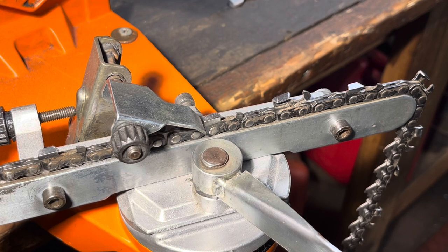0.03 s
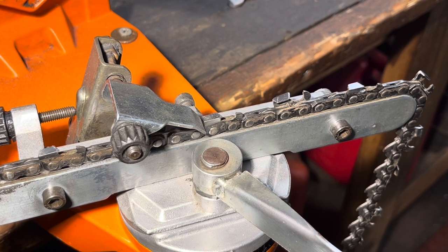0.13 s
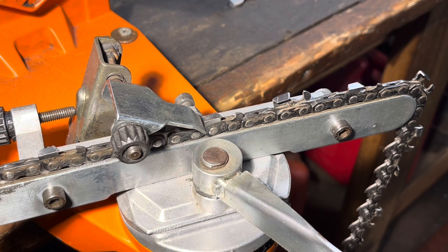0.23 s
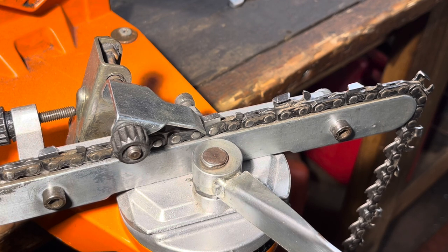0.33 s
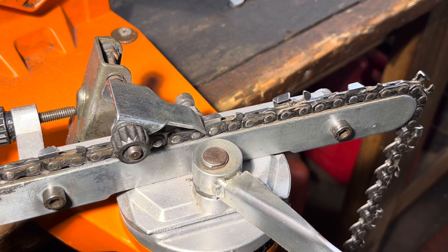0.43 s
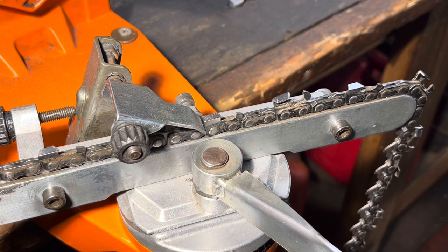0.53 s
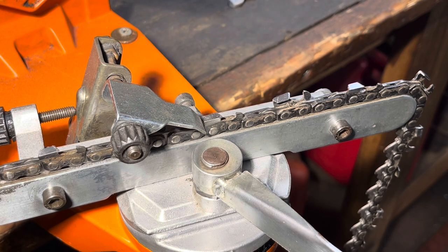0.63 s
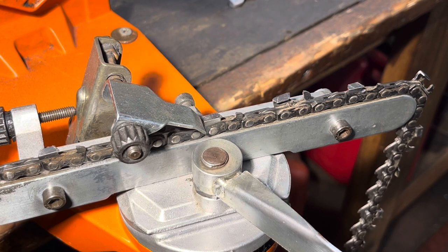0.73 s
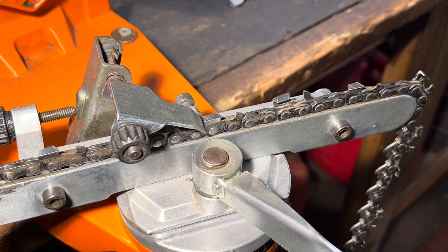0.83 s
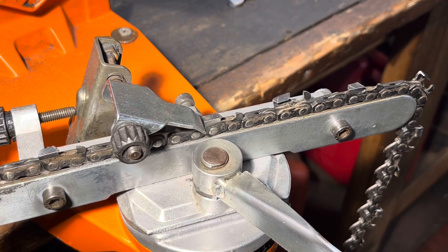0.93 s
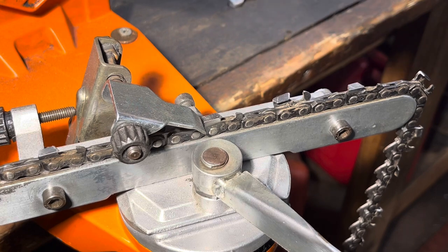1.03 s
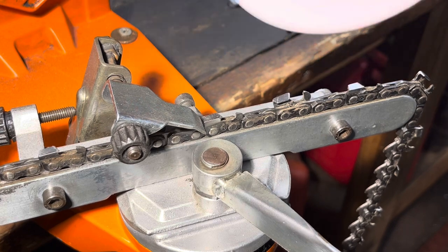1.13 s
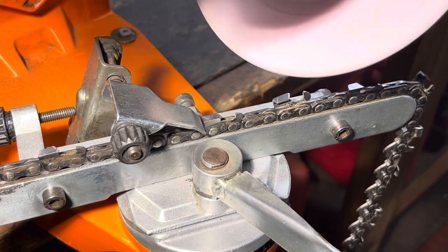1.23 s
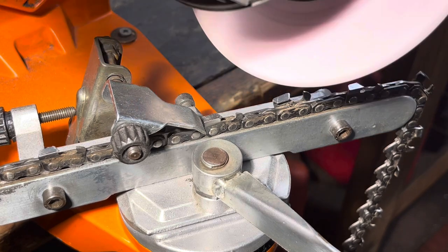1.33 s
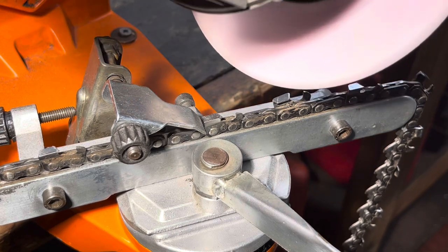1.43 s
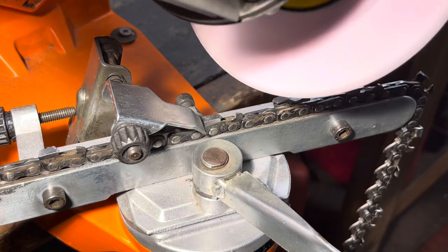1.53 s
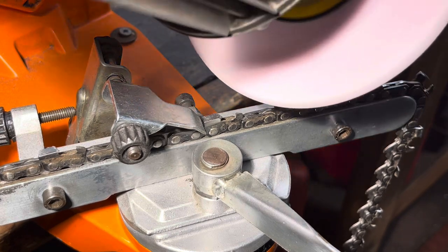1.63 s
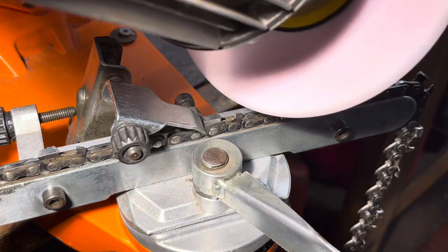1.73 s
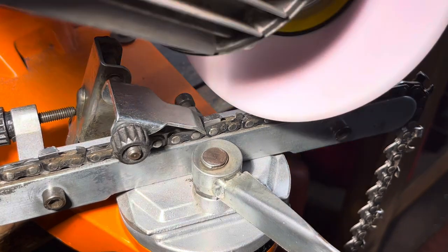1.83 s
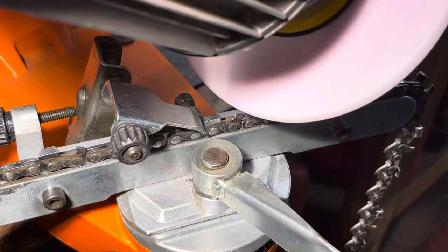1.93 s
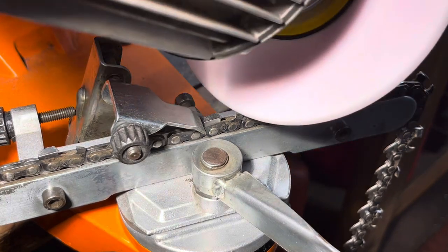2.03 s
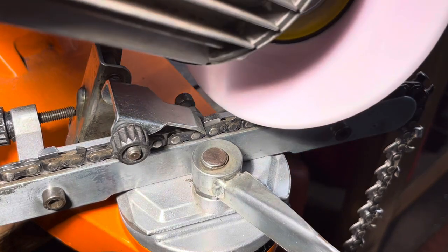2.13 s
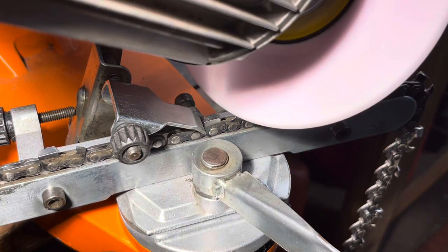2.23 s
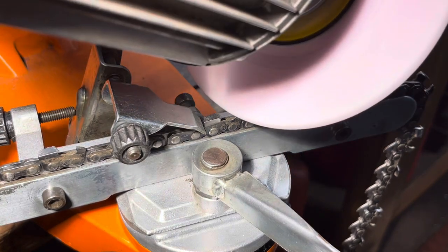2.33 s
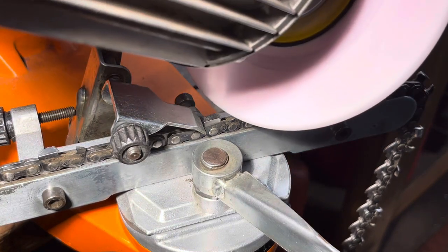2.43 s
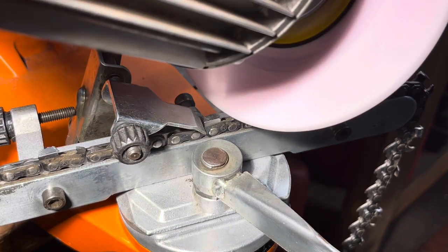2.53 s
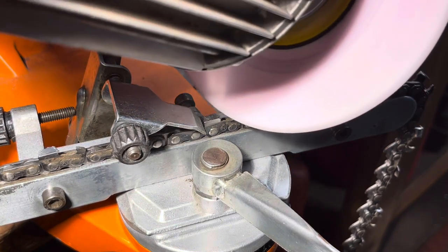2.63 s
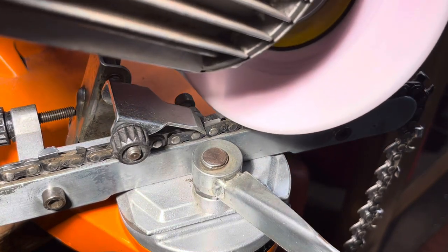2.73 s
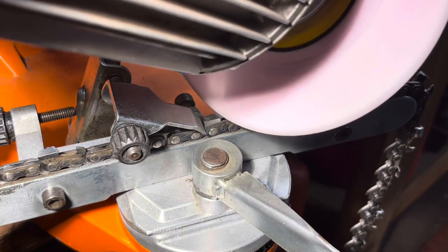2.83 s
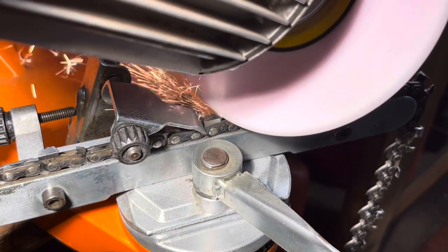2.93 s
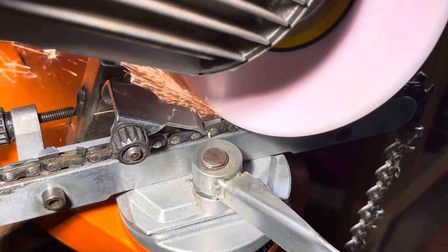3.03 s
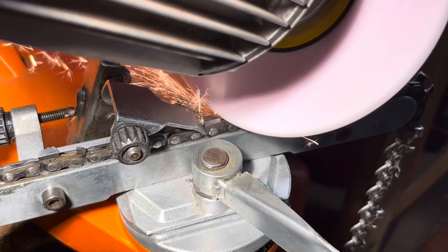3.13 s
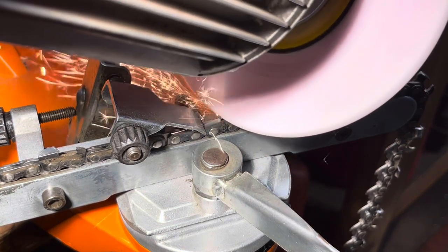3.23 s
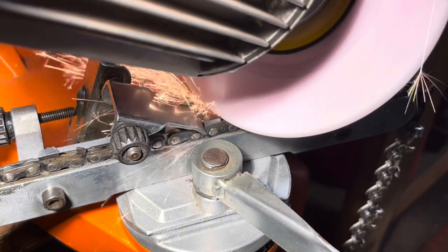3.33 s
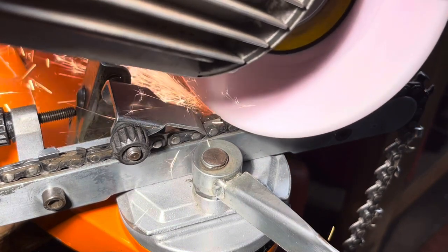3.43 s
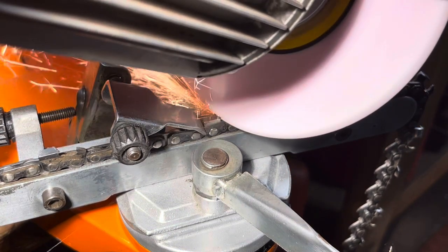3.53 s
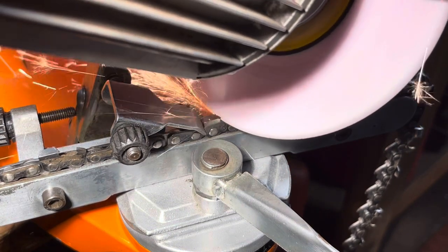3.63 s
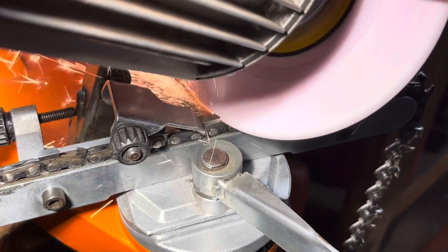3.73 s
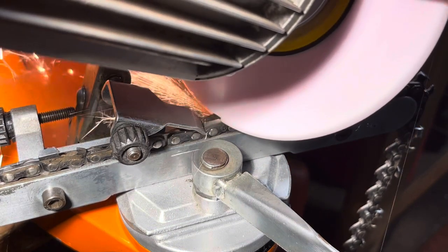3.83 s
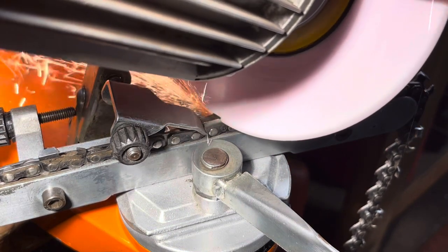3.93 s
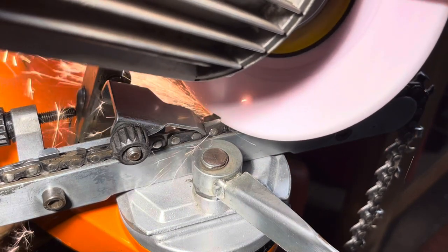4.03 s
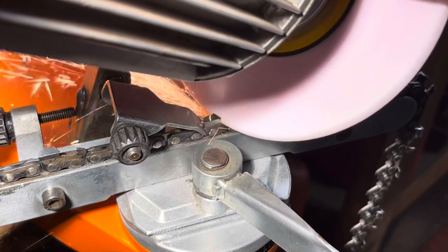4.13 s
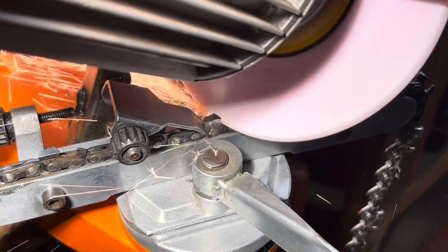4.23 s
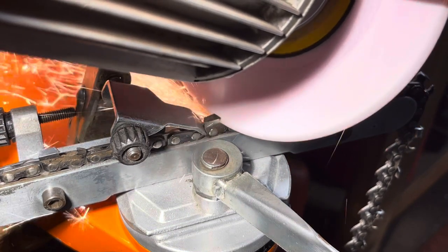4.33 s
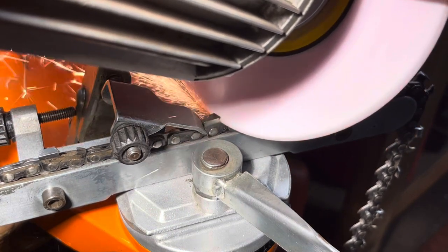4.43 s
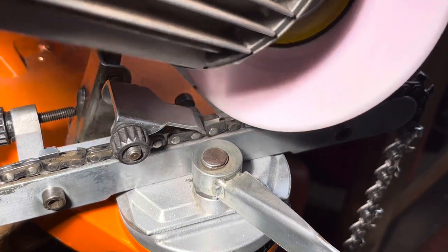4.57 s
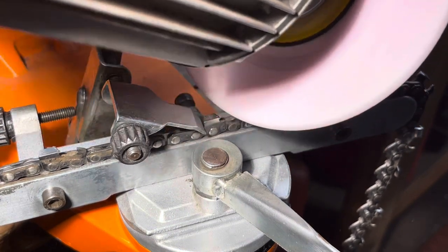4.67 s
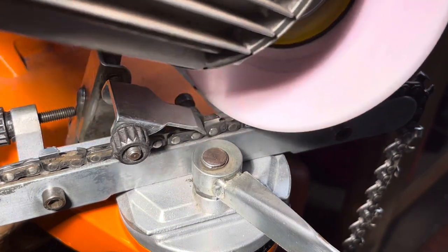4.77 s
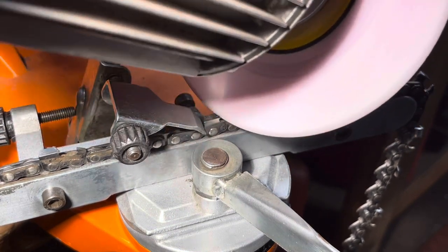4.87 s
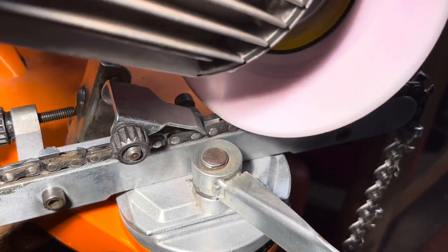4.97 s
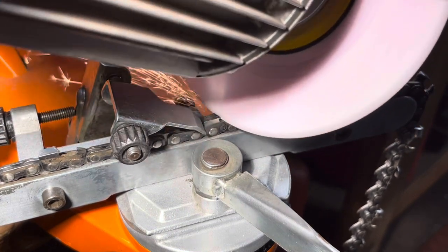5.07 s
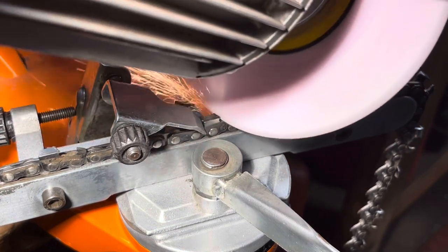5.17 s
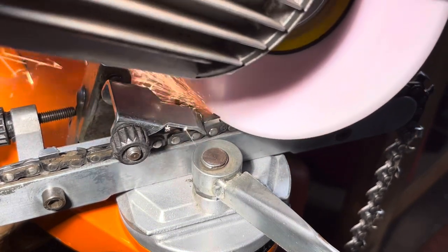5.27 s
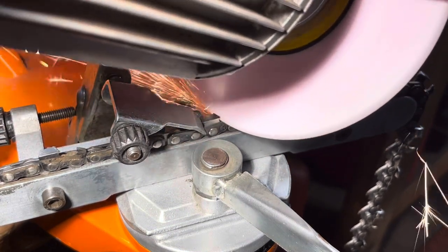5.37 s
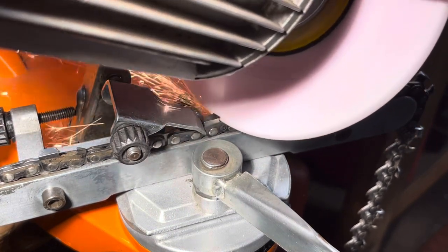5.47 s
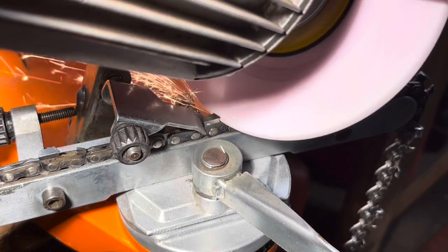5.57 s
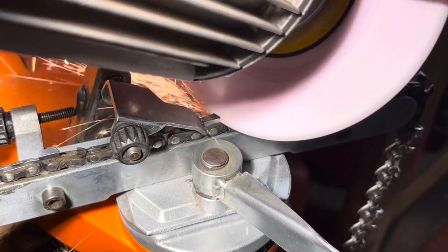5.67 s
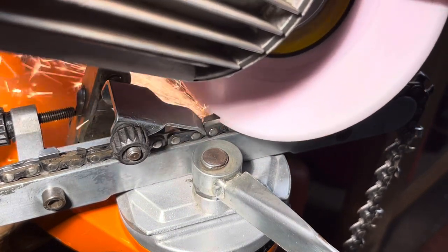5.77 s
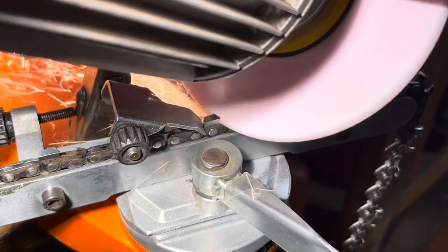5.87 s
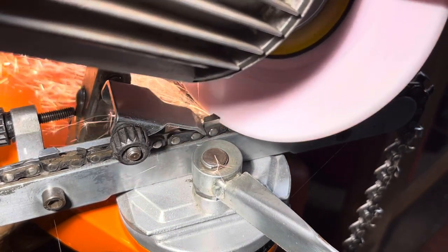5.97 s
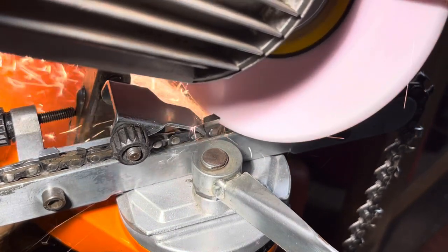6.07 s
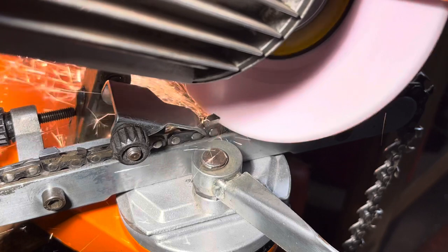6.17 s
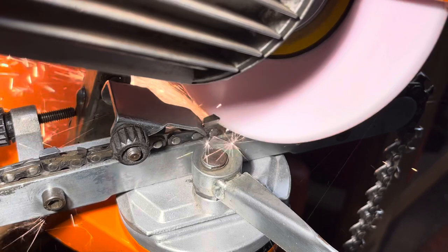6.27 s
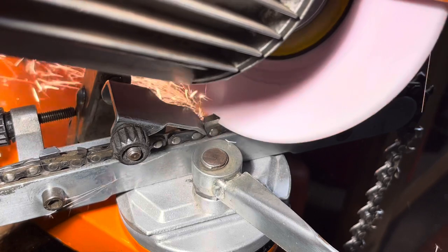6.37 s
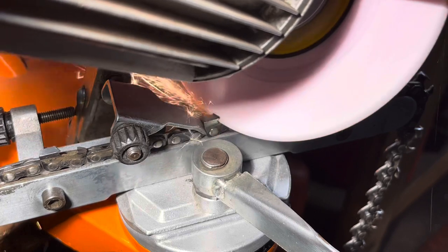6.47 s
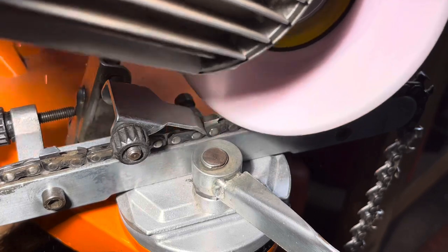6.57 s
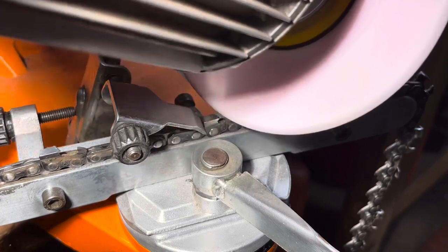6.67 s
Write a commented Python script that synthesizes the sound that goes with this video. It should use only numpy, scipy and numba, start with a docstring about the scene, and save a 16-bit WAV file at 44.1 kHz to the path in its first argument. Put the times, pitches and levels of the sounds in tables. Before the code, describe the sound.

Close up in a small workshop, a bench chain grinder switches on with a short electrical buzz and rising whine, then settles into airy whirring that grows as the head lowers. The wheel knocks a saw tooth and grinds loudly, first in fast fluttering bites, then a dense, squealing rasp. It lifts briefly, leaving faint motor noise and a clear ring, then a second pass begins lightly and swells, ending as the wheel lifts.

```python
"""Chain grinder on a saw tooth

A bench chain grinder runs up in a small workshop: windings buzz, rotor slots whine, fan noise and tones rise.
The wheel is pressed twice on a tooth: first only its high side bites, once a turn, then the whole rim rasps.
Noise laid round the rim, mostly repeating each turn, drives the rasp and the resonances of tooth and machine.
The motor slows under load; tooth and cutting edge ring and squeal as modes of variable pitch and damping."""
import sys
import numpy as np
from scipy import signal
from scipy.fft import rfft, irfft, next_fast_len
from scipy.io import wavfile
from scipy.ndimage import uniform_filter1d, map_coordinates
from numba import njit

SR = 44100
rng = np.random.default_rng(int(sys.argv[2]) if len(sys.argv) > 2 else 0)


def pcm_store(signal):
    """Save signal as 16-bit PCM."""
    levels = np.round(np.clip(np.atleast_2d(signal), -1, 1) * 32767)
    wavfile.write(sys.argv[1], SR, levels.astype(np.int16).T)


N = 295514
T = np.arange(N) / SR

# run-up: t/s, share of full speed
RUN_UP = [(.05, 0), (.245, .93), (.31, 1)]
# shaft dragged down, per pass: t/s, speed/(turns/s)
SAG = [
    [(2.86, 59.2), (3.0, 58.95), (3.17, 58.2), (3.3, 58.1), (3.47, 57.4), (3.62, 57.15), (3.72, 56.5),
     (3.95, 57), (4.18, 56.6), (4.33, 55.8), (4.48, 57.5), (4.62, 59.2)],
    [(5.05, 59.2), (5.28, 58.6), (5.62, 58.4), (5.78, 57.8), (5.92, 55.9), (6.05, 55.1), (6.27, 55.1),
     (6.45, 57.9), (6.55, 58.2), (6.62, 59.2)],
]
# winding buzz before its envelope: f/Hz, level/dB
START_BUZZ = [(463, -57.5), (657, -66), (802, -70), (1421, -70), (2400, -75)]
FULL_SPEED_TURNS_PER_S = 59.2
BUZZ_FLUTTER_DB = 3.5
SLOTS_PER_TURN, WHINE_DB, WHINE_FRAY_RAD = 30, -44.8, 1.2
WHINE_SWELL_S = (0.118, 0.14, 0.05)  # start, hold, release
HOUSING_DB, HOUSING_SWELL_S = -50, (0.13, 0.07, 0.11)
ATTACK_S = 0.0072  # default swell

# head position: t/s, 0 up - 1 down
HEAD_DOWN = [(.35, 0), (.98, 0.13), (1.15, 0.37), (1.6, 0.41)]
# motor and bearing tones at full speed: f/Hz, level head up/dB, level head down/dB
TONES = [(591, -52.5, -41.5), (1180, -54.5, -50), (1783, -57, -37), (2223, -54, -32), (2503, -49.5, -39),
         (2552, -59, -43), (2783, -66.5, -33), (3065, -67, -36), (3343, -57, -61), (3625, -59.5, -62),
         (3905, -63, -57), (4188, -55, -45), (4237, -53, -53), (4275, -59, -62), (4517, -55.5, -68),
         (4797, -62, -55), (5076, -58, -76), (5308, -70, -49), (5355, -66, -66), (5642, -67, -70),
         (5922, -71, -31), (6202, -74, -45)]
# fan draught spectrum: f/Hz, level/dB per Hz
DRAUGHT = [(20, -44), (35, -34), (55, -5), (90, -1.5), (140, -2), (220, -3.5), (400, -9), (550, -8.5),
           (900, -40), (2000, -84.5)]
# fan whir spectrum: f/Hz, level/dB per Hz
WHIR = [(250, -33), (650, -7.5), (900, -13), (1250, -8), (1480, -2.5), (2000, -9), (2400, -3.5),
        (2800, -13.5), (3700, -15.5), (5200, -23.5), (7000, -22.5), (8700, -18), (9300, -24), (15500, -32)]
# bearing roughness spectrum: f/Hz, level/dB per Hz
BEARING = [(300, -26), (1200, -2.5), (2500, -31), (3500, -5.5), (4600, 5.5), (6200, 1), (8000, -33)]
# diffuse part of the motor noise: f/Hz, level/dB per Hz
DIFFUSE_MOTOR = [(40, -30), (120, -0.5), (500, -6), (1200, -3.5), (2500, -28), (5000, -17), (8000, -26),
                 (14000, -40.5)]
# base levels at full speed, before trim and gain drop: (head up, head down)
DRAUGHT_DB, WHIR_DB, HUM_DB = (-42, -29), (-39.5, -31.5), (-47, -34)
DRAUGHT_TRIM_DB, WHIR_TRIM_DB = 0.5, 0.4
DRAUGHT_POWER, WHIR_POWER, HUM_POWER, TONE_POWER = 4, 1.8, 0.86, 28  # exponents of speed
BEARING_DB, DIFFUSE_MOTOR_DB = -15.0, -11  # re whir before trim
TONE_FLUTTER_DB = 2.7
GAIN_DROP_DB, GAIN_DROP_S = 14.5, 0.4  # motor heard fainter from first touch: depth, time constant

# passes: touch t/s, lift t/s, lag of the high side/turns, once-a-turn swing at light touch/dB
CONTACT = [(2.861, 4.515, 0.049, 6), (5.03, 6.557, -0.18, 5.5)]
# hand pressure per pass: t/s, level/dB
PRESSURE = [
    [(2.87, -21), (3.0, -21.5), (3.05, -23), (3.3, -23), (3.5, -19.5), (3.59, -24), (3.8, -21), (4.1, -23),
     (4.41, -23), (4.46, -28)],
    [(5.03, -37.5), (5.06, -31.5), (5.14, -35), (5.21, -27), (5.8, -25.5), (5.94, -22.5), (6.3, -21.5),
     (6.45, -28), (6.53, -32), (6.555, -32.5)],
]
LIGHT_CUT_TURNS_PER_S, FULL_LOAD_SAG_TURNS_PER_S = 58.7, 2.2  # load starts below; further sag at full load
LOADED_SWING_DB, BED_IN_POWER = .5, .32  # swing at full load; exponent of load
BITE_SKEW_RAD, BITE_SCATTER_DB = 0.39, 1.1  # skew: quick bite, slow release; scatter at zero load
LIFT_S = .024
# pairs: (light touch, full load)
REPEAT = (0.934, 0.875)  # share of the grit pattern kept each turn
PATCH_DB = (1.7, .8)  # depth of coarse rim patches
JUDDER_DB = (1.05, 3.1)  # depth at the cutting edge
GRIT_JUDDER_SHARE = 0.14
BOUNCE_SWELL_S, BOUNCE_REPEAT = (6.13, 0.22, 0.17), 0.2  # wheel skips: the pattern repeats less

# rasp spectrum: f/Hz, level/dB per Hz
RASP = [(1200, -26), (2050, -14.5), (2600, -5), (3600, -10), (4100, -4.5), (4330, -14.5), (4650, -5),
        (5250, -5.5), (5750, -28), (6200, -11), (6500, -10), (7250, -21.5), (7600, -3), (8600, -34),
        (9100, -4), (9700, -10), (10800, -17.5), (11400, -5), (11900, -21), (12600, -3.5), (13050, -18),
        (13450, -7), (13900, -9), (14400, -20), (14900, -11.5), (15300, -29), (15700, -47)]
# loose chain links: f/Hz, width/Hz, level/dB
LOOSE_LINKS = [(2607, 93, -1), (3110, 71, 6), (3460, 113, 1.5), (3830, 110, -6), (4468, 75, 6),
               (4640, 100, -6), (4952, 53.5, 2.5), (5340, 110, -4)]
# links pressed tight, per pass: f/Hz, width/Hz, level/dB
TIGHT_LINKS = [
    [(2787, 86, -9), (3150, 150, 1), (3450, 70, 1), (3770, 67, 0.5), (3860, 200, -2), (4320, 90, -4.5),
     (4680, 170, 7.5), (5040, 86, -7), (5270, 78, 2)],
    [(2300, 59, -1.5), (2690, 44, -1.5), (3120, 49, -4.5), (3495, 90, -6.5), (4210, 110, -5),
     (4530, 130, 3.5), (4920, 100, 3), (5340, 110, 1.5), (5920, 86, -5.5)],
]
# swing arm: f/Hz, width/Hz, level/dB
ARM = [(692, 13.5, 0)]
# bench, per pass: f/Hz, width/Hz, level/dB
BENCH = [
    [(224, 46, -13), (492.3, 12, 11.5), (530.5, 10, -4)],
    [(50.08, 37, -18), (126, 60, -6.5), (210, 39, -8.5), (343, 21, -3.5), (505, 52, 5)],
]
# vice, per pass: f/Hz, width/Hz, level/dB
VICE = [
    [(1028, 19, -10.5), (1225, 34.6, 3.5), (1368, 8.6, 6), (1464, 38, -2.5)],
    [(1002, 70, -6.5), (1206, 94, 2.5), (1480, 76, -6)],
]
# clamp, per pass: f/Hz, width/Hz, level/dB
CLAMP = [
    [(1693, 14, -1), (1732, 30, 5.5), (1877, 18, 3)],
    [(1676, 35, -16), (1745, 22, -7)],
]
# singing tooth: f/Hz, rise at full load/Hz, level/dB
TOOTH = [(2992, 30, -3)]
# squealing cutting edge: f/Hz, rise at full load/Hz, level/dB
SQUEAL = [(6798, 60, 0), (7385, 10, -17), (9505, 15, -9), (10190, 10, -18), (12600, 10, -2),
          (13420, 10, -9)]
# answer of each part to the press, per pass: level light touch/dB, level full load/dB
ANSWER = {"bench": [(-18, -33.5), (-57, -17)], "arm": [(-24.5, -25.5), (-22, -21)], "vice": [(-2, -5.5),
          (-7, -5)], "clamp": [(-12, -11), (-11.5, -13.5)], "tooth": [(-0.5, -15), (-2.5, -12)],
          "edge": [(-2, -2.5), (-1.5, 1)]}
# part catches or is stifled: t/s, attack/s, hold/s, release/s, gain/dB, part
CATCHES = [(2.877, .008, 0.12, 0.059, 10.5, "bench"), (2.991, .01, 0.24, 0.45, 2, "vice"),
           (2.991, 0.017, 0.051, 0.057, 1, "tooth"), (2.989, 0.024, 0.34, 0.44, 9, "tooth"),
           (3.04, 0.018, 0.044, 0.074, 5.5, "edge"), (3.064, 0.025, 0.65, 0.13, 8, "arm"),
           (3.17, 0.083, 0.18, 0.25, 2, "clamp"), (3.406, 0.062, 0.096, 0.035, -0.5, "edge"),
           (4.125, 0.045, 0.29, 0.077, 12, "bench"), (4.364, .03, 0.053, .02, 4, "edge"),
           (4.417, .02, .12, 0.033, -2, "edge"), (5.02, .008, 0.055, 0.04, 5.5, "edge"),
           (5.57, 0.079, 0.14, 0.1, 5, "tooth"), (5.68, .05, 0.16, 0.12, 2.5, "vice"),
           (5.867, .04, 0.057, 0.093, 8, "tooth"), (6.162, .008, 0.032, 0.25, 9, "bench"),
           (6.4, .07, 0.16, .03, -3, "edge"), (6.454, .02, 0.1, 0.045, 7.5, "vice")]
# clamp or link locks into one note: t/s, attack/s, hold/s, release/s, f/Hz, level/dB
NOTES = [(2.857, .005, 0.17, 0.072, 1655, -26), (2.875, .02, 0.1, .06, 4952, -30.5),
         (3.17, 0.093, 0.21, 0.25, 1645, -26.5), (4.993, 0.011, 0.08, .12, 1655, -48),
         (5.17, .035, 0.49, 0.16, 1756, -34), (4.47, .03, .02, .04, 4952, -42),
         (6.5, .03, .03, .04, 4560, -44)]
# diffuse part of the grinding noise: f/Hz, level/dB per Hz
DIFFUSE_GRIND = [(150, -11.5), (500, -9), (1200, 12), (2200, 0.5), (4500, -39), (7000, 6), (8300, -41),
                 (10000, 0), (13000, -2), (15000, -30)]
RASP_DB, LINK_DB = (-0.5, 0.5), (-4.5, -4)  # re press: (light touch, full load)
DIFFUSE_GRIND_DB = -18  # re press
NOTE_WIDTH_HZ, NOTE_PULSE_DB = 20, 6.5
TOOTH_WIDTH_HZ, EDGE_WIDTH_HZ, FREE_WIDTH_HZ = (10, 45), (18, 73), 7.9  # (light, full load); wheel off
TOOTH_SMOOTH_S = .014  # tooth bridges gaps between bites
# high spot knocks the tooth: t/s, level/dB
KNOCKS = [(2.862, -17), (4.996, -45), (5.015, -29.5), (5.030, -29.5)]
# ring of a knock: f/Hz, level/dB, t60/s
KNOCK_MODES = [(1655, -9, 0.064), (2990, -9.5, 0.095), (4570, -6, 0.023), (7040, -9, 0.11),
               (9450, 6, 0.055), (12605, -2, 0.063)]
CRACK_DB, CRACK_T60_S = -0.5, .014

# room decay: f/Hz, t60/s
WORKSHOP = [(200, 0.17), (2000, 0.21), (12000, 0.22)]
# strength of the room's answer: f/Hz, level/dB
ECHO = [(40, -11), (250, 6), (1100, 8.5), (2200, 1), (4200, -33), (7000, 16), (8200, -14), (10000, -3),
        (14000, -14)]
# phase lead of left over right: f/Hz, phase/rad
PORTS = [(100, .1), (600, .7), (1030, 1.4), (1090, 4.5), (1500, 4.3), (1700, 5.8), (1900, 6), (3700, 6.2),
         (5200, 6.28), (6300, 5.7), (7300, 4.8), (7700, 3.25), (9100, 3.05), (9600, 2.1), (11000, 0),
         (12200, 0), (12650, -.5), (13200, -.5), (13700, -1.4), (14000, -2.8), (15000, -3.1)]
# motor balance: f/Hz, left minus right/dB
MOTOR_BALANCE = [(60, 1), (250, 1.5), (640, 1.5), (1100, 10.5), (1500, -9), (2300, -3.5), (3500, 5),
                 (7000, 0)]
# grinding balance: f/Hz, left minus right/dB
GRIND_BALANCE = [(60, 0), (300, .5), (600, 2), (1200, .3), (2500, -.4), (4000, 0)]
ROOM_DB, HISS_DB, TOP_HZ = -18.5, -56.5, 15800


def amp(db):
    """Decibels to gain."""
    return 10 ** (np.asarray(db) / 20)


def unit(x):
    """Scale x to rms 1."""
    return x / np.sqrt(np.mean(x ** 2) + 1e-20)


def between(ends, share):
    """From the first value at share 0 to the second at share 1."""
    return ends[0] + share * (ends[1] - ends[0])


def along(points, hz):
    """Read (f/Hz, value) points on a log axis."""
    f, v = np.transpose(points)
    return np.interp(np.log(hz + 1), np.log(f + 1), v)


def curves(rows):
    """One value per sample for each column after the time."""
    s, *cols = np.transpose(rows)
    return [np.interp(T, s, c) for c in cols]


def swell(start, hold, release, attack=ATTACK_S):
    """Attack, hold (timed from start) and release, from 0 to 1 and back."""
    rise = np.clip((T - start) / attack, 0, 1)
    fall = np.clip(1 - (T - start - hold) / release, 0, 1)
    return rise * fall


def wobble(rate_hz):
    """Smooth random curve, rate_hz knots a second."""
    knots = rng.standard_normal(int(N * rate_hz / SR) + 4)
    return map_coordinates(knots, [T * rate_hz])


def filtered(x, response):
    """Apply a complex response of frequency."""
    m = next_fast_len(N + SR // 2)
    return irfft(rfft(x, m) * response(np.fft.rfftfreq(m, 1 / SR)), m)[..., :N]


def colour(points):
    """Response of a spectrum given in dB."""
    return lambda hz: amp(along(points, hz))


def body(modes):
    """Causal response of a few damped resonances in parallel."""
    return lambda hz: sum(amp(db) * 1j * hz * w / (c * c - hz * hz + 1j * hz * w) for c, w, db in modes)


def noise(points):
    """Coloured noise of rms 1."""
    return unit(filtered(rng.standard_normal(N), colour(points)))


def diffuse(points):
    """Coloured noise, unrelated at the two microphones."""
    return np.array([noise(points), noise(points)])


def driven(force, response, level):
    """Part shaken by the force at a given level; it rings on when the level drops."""
    power = uniform_filter1d(filtered(force, response) ** 2, SR // 10)
    return filtered(force * level / np.sqrt(abs(power) + 1e-12), response)


def shaft_speed():
    """Turns per second: the rotor runs up, idles and sags in each pass."""
    return curves(np.vstack(SAG))[0] * curves(RUN_UP)[0]


def winding_buzz():
    """Fluttering tones of the windings at switch-on."""
    buzz = sum(amp(db + BUZZ_FLUTTER_DB * wobble(45)) * np.sin(2 * np.pi * hz * T + wobble(110))
               for hz, db in START_BUZZ)
    return buzz * np.interp(T, [0, .08, .25], [1.4, 3.2, 0])


def slot_whine(speed):
    """Rotor slots passing: a frayed tone that follows the shaft upwards."""
    phase = 2 * np.pi * SLOTS_PER_TURN * np.cumsum(speed) / SR
    tone = amp(2 * wobble(200)) * np.sin(phase + WHINE_FRAY_RAD * wobble(420))
    return amp(WHINE_DB) * swell(*WHINE_SWELL_S) * unit(tone)


def housing_ring():
    """Noise through the housing's two resonances, applied twice."""
    response = body([(2400, 300, 0), (4220, 200, -6)])
    ring = filtered(rng.standard_normal(N), lambda hz: response(hz) ** 2)
    return amp(HOUSING_DB) * swell(*HOUSING_SWELL_S) * unit(ring)


def switch_on(speed):
    """Winding buzz, slot whine and housing ring of the start."""
    return winding_buzz() + slot_whine(speed) + housing_ring()


def grit(turns, repeat, spiky_db, size=768):
    """Force of the grains round the rim: one pattern a turn, partly renewed each turn."""
    count = int(turns[-1]) + 3
    rim = rng.standard_normal((count, size)) * amp(spiky_db * rng.standard_normal((count, size)))
    keep = np.clip(np.interp(np.arange(count), turns, repeat), 0, .99)
    for k in range(1, count):
        rim[k] = keep[k] * rim[k - 1] + np.sqrt(1 - keep[k] ** 2) * rim[k]
    return map_coordinates(rim.ravel(), [turns * size])


def bearing_rattle(turns):
    """Roughness that comes round every turn: a comb of weak lines, rms 1."""
    return unit(filtered(grit(turns, np.full(N, .96), spiky_db=0), colour(BEARING)))


def shaft_tones(turns, down, speed_db):
    """Motor and bearing tones tied to the shaft angle; they stand out only near full speed."""
    clock = turns / FULL_SPEED_TURNS_PER_S
    tones = 0
    for hz, up_db, down_db in TONES:
        level_db = between((up_db, down_db), down) + TONE_FLUTTER_DB * wobble(60) + 2.6 * wobble(4)
        tones = tones + amp(level_db) * np.sin(2 * np.pi * hz * clock + .5 * wobble(45))
    return np.sqrt(2) * tones * amp(TONE_POWER * speed_db)


def motor(speed):
    """Draught, whir, rattle, tones and hum grow with speed; all are heard fainter from first touch."""
    down = curves(HEAD_DOWN)[0]
    speed_db = 20 * np.log10(np.clip(speed / FULL_SPEED_TURNS_PER_S, .2, 1))
    turns = np.cumsum(speed) / SR
    draught_db = between(DRAUGHT_DB, down) + DRAUGHT_POWER * speed_db
    whir_db = between(WHIR_DB, down) + WHIR_POWER * speed_db
    hum_db = between(HUM_DB, down) + HUM_POWER * speed_db
    draught = amp(draught_db + DRAUGHT_TRIM_DB + 0.68 * wobble(18)) * noise(DRAUGHT)
    whir = amp(whir_db + WHIR_TRIM_DB) * noise(WHIR)
    bearing = amp(whir_db + BEARING_DB) * bearing_rattle(turns)
    tones = shaft_tones(turns, down, speed_db)
    hum = np.sqrt(2) * amp(hum_db + 4.2 * wobble(14)) * np.sin(2 * np.pi * 119 * T + 0.76 * wobble(14))
    gain_db = GAIN_DROP_DB * np.expm1(-np.maximum(T - CONTACT[0][0], 0) / GAIN_DROP_S)
    diffuse_part = amp(gain_db + whir_db + DIFFUSE_MOTOR_DB) * diffuse(DIFFUSE_MOTOR)
    return amp(gain_db) * (draught + whir + bearing + tones + hum), diffuse_part


def faint_hiss():
    """Steady coloured background noise."""
    return amp(HISS_DB) * noise([(30, -17), (100, 8.5), (1500, -13), (4000, -25), (15000, -31)])


@njit
def resonate(force, pole):
    """One mode whose pitch and damping may change at every sample."""
    out = np.zeros(len(force), np.complex128)
    for n in range(1, len(force)):
        out[n] = pole[n] * out[n - 1] + force[n]
    return out


def sing(force, drive, hz, width_hz):
    """Grit feeds one mode up to the drive's level; it rings on when the drive stops."""
    pole = np.exp((2j * np.pi * hz - np.pi * abs(width_hz)) / SR) * np.ones(N)
    band = signal.butter(1, np.mean(hz) + np.array([-350, 350]), "bandpass", fs=SR, output="sos")
    push = signal.sosfilt(band, force) * drive
    wanted, got = (abs(uniform_filter1d(abs(v) ** 2, SR // 16)) for v in (drive, resonate(push, pole)))
    return np.sqrt(2) * resonate(push * np.sqrt(wanted / (got + 1e-12)), pole).real


def notes(force, high_sides):
    """A caught part swells into one note, nudged once a turn, and fades as it works loose."""
    nudge = unit(amp(NOTE_PULSE_DB * np.where(T < CONTACT[0][1], *high_sides)))
    return sum(sing(force, amp(db) * swell(s, hold, release, attack) * nudge, hz, NOTE_WIDTH_HZ)
               for s, attack, hold, release, hz, db in NOTES)


def bites(turns, load):
    """Press per pass: hand pressure swung once a turn by the high side, evened out by load."""
    presses, high_sides = [], []
    for (touch, lift, lag, light_swing_db), pressure in zip(CONTACT, PRESSURE):
        angle = 2 * np.pi * (turns - np.interp(touch, T, turns) - lag)
        high_side = np.sin(angle + BITE_SKEW_RAD * np.sin(angle))
        swing_db = between((light_swing_db, LOADED_SWING_DB), load ** BED_IN_POWER)
        contact = np.clip((T - touch) / 0.001, 0, 1) * np.clip((lift - T) / LIFT_S + 1, 0, 1) ** 2
        bite = amp(swing_db * high_side) / np.sqrt(np.i0(2 * np.log(amp(swing_db))))  # mean power near 1
        level_db = curves(pressure)[0] + BITE_SCATTER_DB * (1 - load) * wobble(FULL_SPEED_TURNS_PER_S)
        presses.append(contact * bite * amp(level_db))
        high_sides.append(high_side)
    return presses, high_sides


def cutting_force(turns, load, judder_db):
    """Grit force, with coarse rim patches and a little judder on top."""
    bounce = swell(*BOUNCE_SWELL_S)
    repeat = between((between(REPEAT, load), BOUNCE_REPEAT), bounce)
    patches = unit(uniform_filter1d(grit(turns, repeat, spiky_db=-5), size=50))
    flutter_db = between(PATCH_DB, load) * patches + GRIT_JUDDER_SHARE * judder_db * wobble(130)
    return grit(turns, repeat, spiky_db=2.0) * amp(flutter_db)


def chain_links(force, presses, load):
    """Links ring loose at light touch, crossfading to tight resonances under load."""
    links = driven(force, body(LOOSE_LINKS), sum(presses) * amp(LINK_DB[0]) * np.sqrt(1 - load))
    for modes, press in zip(TIGHT_LINKS, presses):
        links += driven(force, body(modes), press * amp(LINK_DB[1]) * load)
    return links


def shaking(part, presses, load):
    """A part's level per pass: follows the press, changes with load, shifts at its catches."""
    catch_db = sum(db * swell(s, hold, release, attack)
                   for s, attack, hold, release, db, name in CATCHES if name == part)
    return [press * amp(between(ends_db, load) + catch_db) for press, ends_db in zip(presses, ANSWER[part])]


def frame(force, level):
    """Grit shakes the resonances of bench, vice and clamp."""
    return sum(driven(force, body(modes), press)
               for part, tables in [("bench", BENCH), ("vice", VICE), ("clamp", CLAMP)]
               for modes, press in zip(tables, level[part]))


def steel(modes, force, drive, load, widths_hz):
    """The wheel stiffens and damps steel modes as it bears down; lifted, they ring clear."""
    pressed = drive > 0
    width_hz = np.where(pressed, between(widths_hz, load), FREE_WIDTH_HZ)
    return sum(amp(db) * sing(force, drive, hz + rise_hz * load * pressed, width_hz)
               for hz, rise_hz, db in modes)


def grinding(speed):
    """Grit rasps, makes tooth and edge sing and shakes links, arm and frame; part of the noise is diffuse."""
    turns = np.cumsum(speed) / SR
    # load read from the shaft's sag
    load = np.clip((LIGHT_CUT_TURNS_PER_S - speed) / FULL_LOAD_SAG_TURNS_PER_S, 0, 1)
    judder_db = between(JUDDER_DB, load)
    presses, high_sides = bites(turns, load)
    press = sum(presses)
    level = {part: shaking(part, presses, load) for part in ANSWER}
    force = cutting_force(turns, load, judder_db)
    rasp = driven(force, colour(RASP), press * amp(between(RASP_DB, load)))
    links = chain_links(force, presses, load)
    arm = driven(force, body(ARM), sum(level["arm"]))
    bridge = round(TOOTH_SMOOTH_S * SR)
    tooth_drive = np.convolve(sum(level["tooth"]), np.full(bridge, 1 / bridge))[:N]
    tooth = steel(TOOTH, force, tooth_drive, load, TOOTH_WIDTH_HZ)
    edge_force = force * amp(judder_db * wobble(110))
    edge = steel(SQUEAL, edge_force, sum(level["edge"]), load, EDGE_WIDTH_HZ)
    diffuse_part = press * amp(DIFFUSE_GRIND_DB) * diffuse(DIFFUSE_GRIND)
    direct = rasp + links + arm + frame(force, level) + tooth + edge + notes(force, high_sides)
    return direct, diffuse_part


def knocks():
    """The rim's high spot knocks the tooth: a short noise crack and a ring of tooth and clamp."""
    out, t = np.zeros(N + SR), np.arange(SR // 4) / SR
    grain = noise(RASP)
    ring = sum(amp(level - 60 * t / t60) * np.sin(2 * np.pi * hz * t) for hz, level, t60 in KNOCK_MODES)
    for s, db in KNOCKS:
        start = round(s * SR)
        crack = amp(CRACK_DB - 60 * t / CRACK_T60_S) * grain[start:][:len(t)]
        out[start:][:len(t)] += amp(db) * (ring + crack)
    return out[:N]


def workshop(x):
    """Room's short answer: noise decaying per band, different at each microphone."""
    hz, t, z = signal.stft(rng.standard_normal((2, SR // 2)), SR, nperseg=256)
    tail = signal.istft(z * amp(-60 * t / along(WORKSHOP, hz)[:, None]), SR, nperseg=256)[1]
    delayed = np.pad(x, (200, 0))[None]
    return signal.fftconvolve(delayed, tail / np.linalg.norm(tail[0]), axes=1)[:, :N]


def microphones(x, balance):
    """Two ports hear a source out of step and at slightly different levels."""
    sides = np.array([[.5], [-.5]])
    return filtered(x, lambda hz: amp(sides * along(balance, hz)) * np.exp(1j * sides * along(PORTS, hz)))


def scene():
    """Motor and grinding, close by and in the room, over a faint hiss."""
    speed = shaft_speed()
    started = switch_on(speed)
    running, diffuse_motor = motor(speed)
    cutting, diffuse_grind = grinding(speed)
    machine, grind = running + started, cutting + knocks()
    room = workshop(filtered(amp(ROOM_DB) * (machine + grind), colour(ECHO)))
    direct = microphones(machine + faint_hiss(), MOTOR_BALANCE) + microphones(grind, GRIND_BALANCE)
    return direct + diffuse_motor + diffuse_grind + room


def record(dry):
    """Band limit: nothing passes from TOP_HZ up."""
    return filtered(dry, lambda hz: hz < TOP_HZ)


dry = scene()
out = record(dry)
pcm_store(out)
```